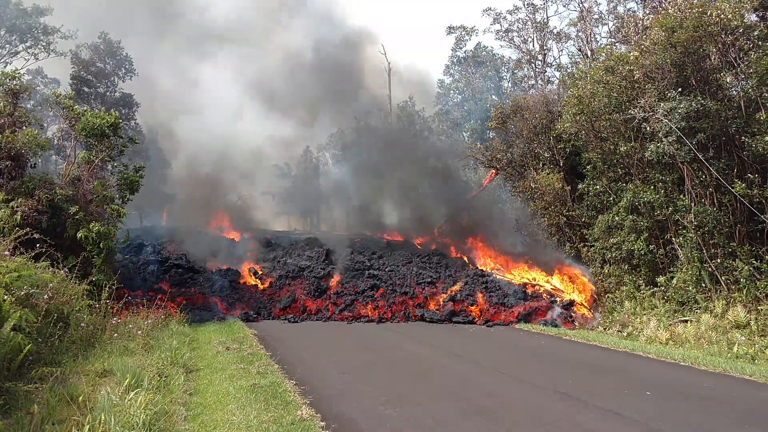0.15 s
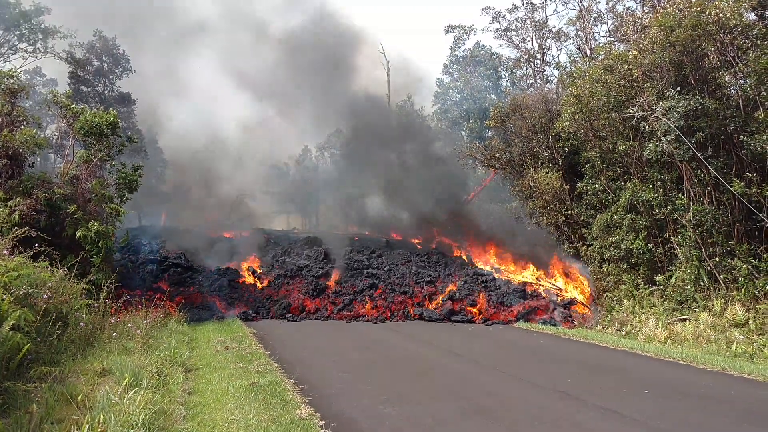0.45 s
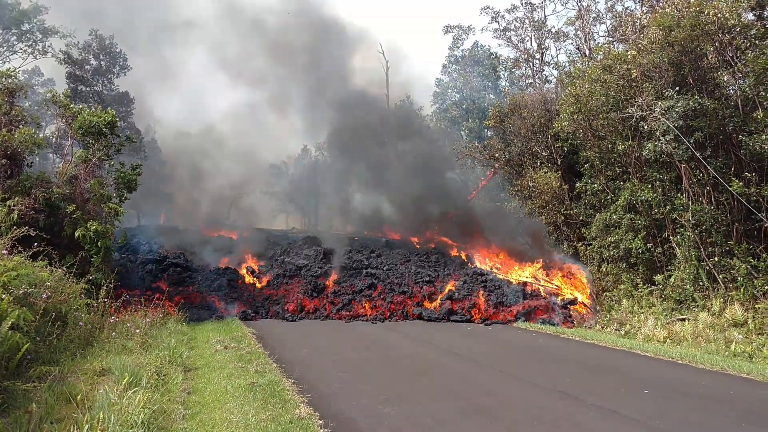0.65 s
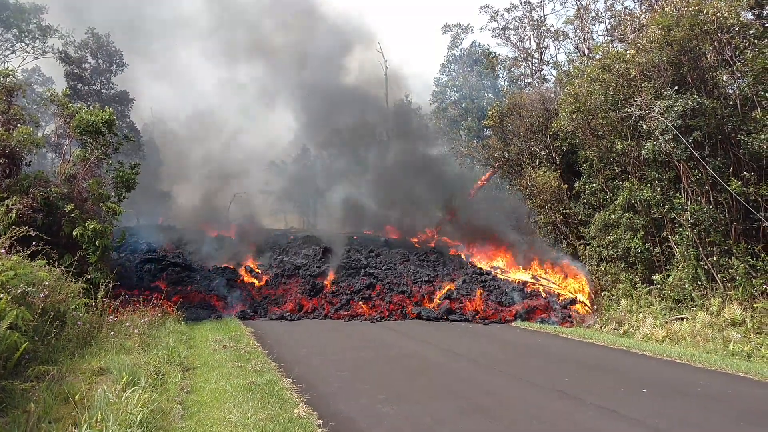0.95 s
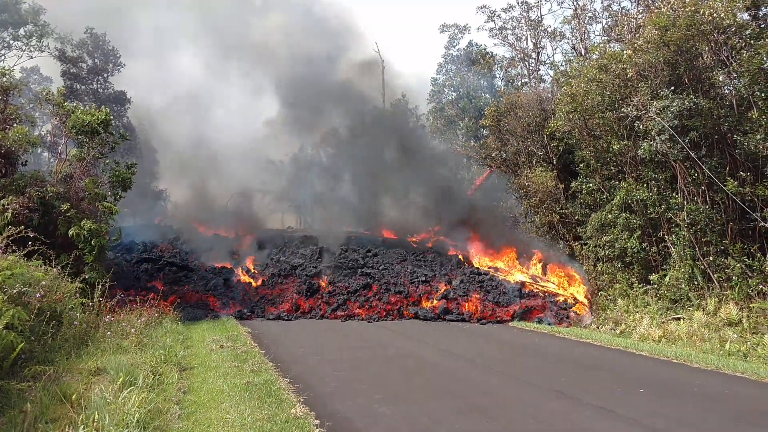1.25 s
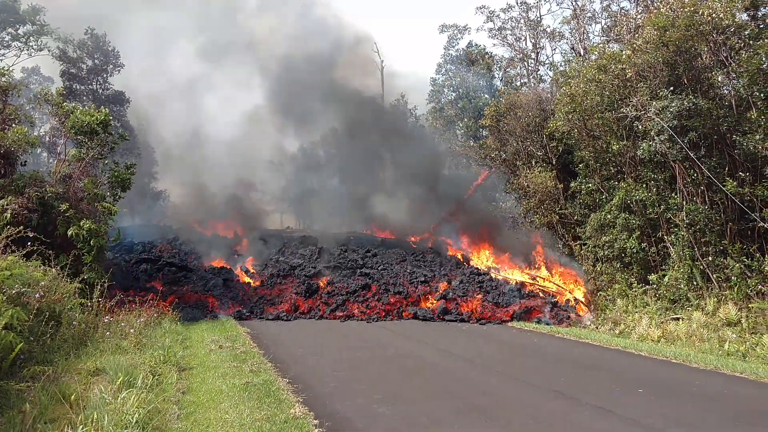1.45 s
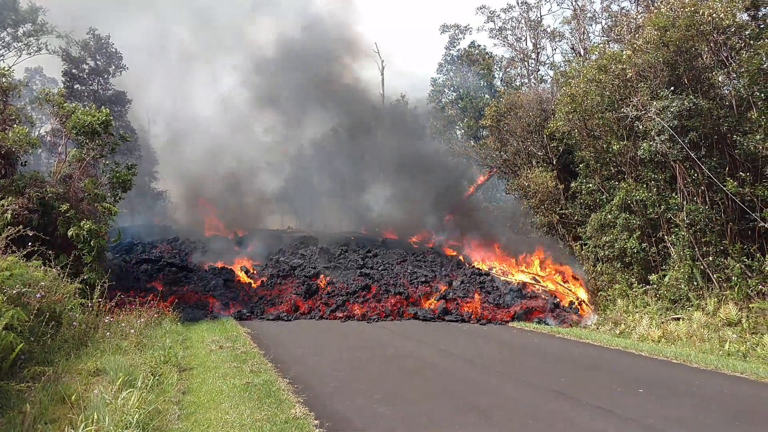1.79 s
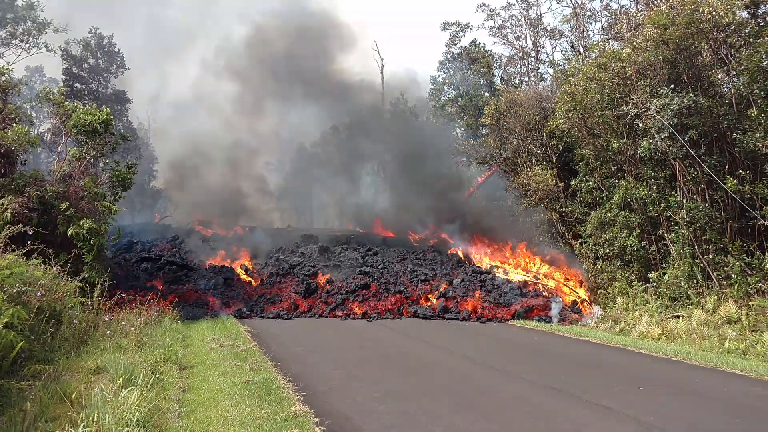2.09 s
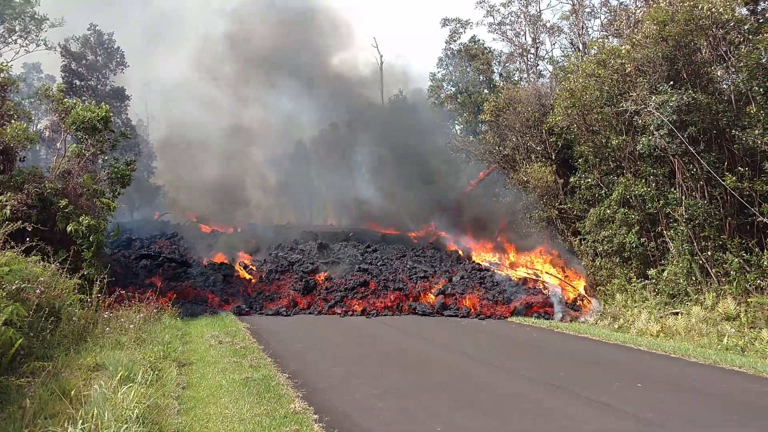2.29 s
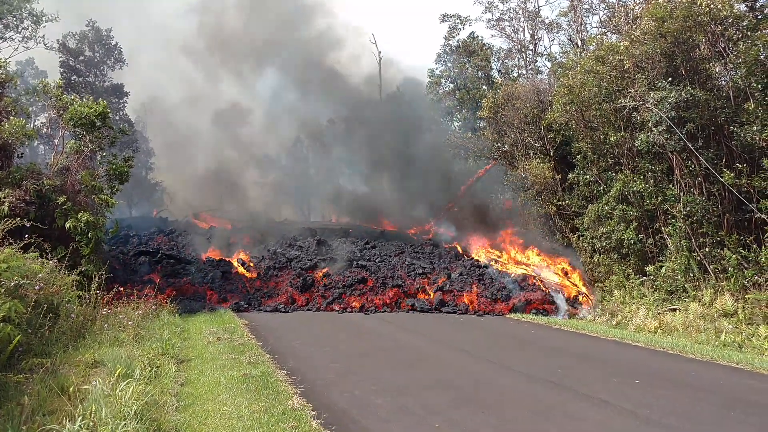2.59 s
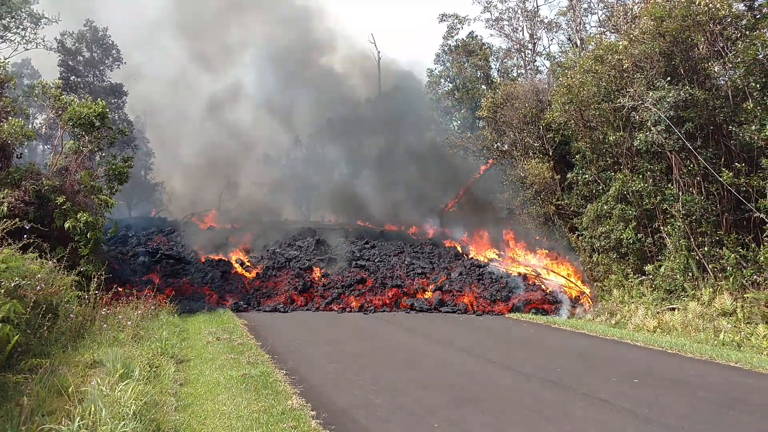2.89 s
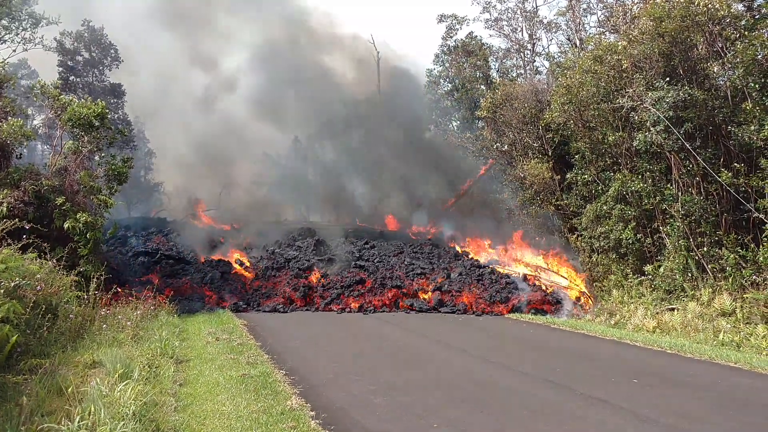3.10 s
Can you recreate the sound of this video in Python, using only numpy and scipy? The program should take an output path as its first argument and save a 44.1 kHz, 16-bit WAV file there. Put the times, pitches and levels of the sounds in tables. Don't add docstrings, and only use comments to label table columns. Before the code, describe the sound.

Steady fiery hiss and roar of creeping lava, crackling and snapping as wind thumps the microphone.

```python
import sys
import numpy as np
from scipy import signal
from scipy.fft import rfft, irfft
from scipy.io import wavfile

SR = 44100
rng = np.random.default_rng(int(sys.argv[2]) if len(sys.argv) > 2 else 0)


def unload_wav(signal):
    wavfile.write(
        sys.argv[1],
        SR,
        np.round(np.clip(np.atleast_2d(signal).T, -1, 1) * 32767).astype(np.int16),
    )


def to_linear_factor(level_db):
    exponent = np.asarray(level_db, float) / 20
    return 10 ** exponent


N = 142884

# time_s, level_db
BLAZE = [(0.0, -45), (0.31, -45), (0.49, -44), (0.84, -39.5), (1.02, -42.5), (1.22, -43), (1.47, -40),
         (1.67, -41.5), (1.91, -44), (2.29, -44), (2.44, -44.5), (2.63, -44), (2.94, -43.5), (3.24, -40.5)]
# frequency_hz, density_db (per Hz)
ROAR_SPECTRUM = [(60, 17.5), (200, -2.5), (500, 6), (1000, -2), (1800, 1.5), (3200, -0.5), (7000, -0.5),
                 (15000, -10.5)]
# frequency_hz, power_share (0-1)
COHERENCE = [(100, 0.78), (600, 0.97), (1200, 0.99), (1800, 0.63), (2600, 0), (5000, 0.09), (12000, 0)]
# frequency_hz, left_over_right_db
HISS_LEAN = [(2000, -6), (3300, -13), (4500, -4), (8500, 5.5), (12000, 2.5)]
# time_s, level_db
GUST = [(0.0, -49.5), (0.14, -60), (0.23, -46), (0.37, -46), (0.46, -46.5), (0.59, -47), (0.78, -47),
        (0.95, -47.5), (1.13, -47), (1.26, -49), (1.84, -57), (2.06, -53), (2.22, -46), (2.28, -49),
        (2.43, -55), (2.69, -57.5), (3.0, -55.5), (3.24, -55)]
# crest_s, peak_db, pitch_hz,
# width_s
BUFFETS = [(0.032, -17, 117, 0.015), (0.065, -19, 145, 0.021), (0.085, -15, 129, 0.005),
           (0.11, -18, 165, 0.0077), (0.246, -16.5, 190, 0.005), (0.259, -21, 167, 0.007),
           (0.272, -8.5, 151, 0.0076), (0.303, -15, 222, 0.0047), (0.318, -9.5, 167, 0.004),
           (0.331, -9, 133, 0.0029), (0.441, -14, 241, 0.0093), (0.48, -8.5, 145, 0.0047),
           (0.517, -16.5, 103, 0.029), (0.538, -23, 148, 0.007), (0.601, -15, 153, 0.005),
           (0.61, -14, 137, 0.0081), (0.715, -9, 98, 0.0062), (0.832, -15, 123, 0.015),
           (0.965, -9, 196, 0.0056), (0.98, -11.5, 157, 0.015), (1.036, -5.5, 136, 0.0022),
           (1.047, -8, 75.5, 0.0021), (1.057, -13, 128, 0.0058), (1.221, -5.5, 179, 0.0023),
           (1.242, -16.5, 153, 0.015), (1.271, -13, 188, 0.014), (2.09, -19.5, 222, 0.0039),
           (2.113, -14.5, 134, 0.012), (2.178, -10, 108, 0.0065), (2.225, -12, 149, 0.0087),
           (.14, -21.5, 128, 0.012), (0.346, -22, 199, 0.0089), (.375, -28.5, 108, 0.036),
          (.402, -20, 151, 0.0098), (.552, -22, 139, 0.0099), (.67, -19, 100, 0.0094),
          (1.111, -34, 149, 0.011), (1.175, -24, 111, 0.027), (1.201, -22.5, 158, 0.011),
          (1.295, -21, 150, .008), (1.879, -27, 70, .012), (2.061, -23.5, 149, 0.012),
          (2.211, -16, 144, 0.014), (2.271, -23.5, 159, 0.018), (3.001, -31, 110, 0.015)]
# start_s, peak_db, centre_hz, left_lead_ms
SNAPS = [(0.019, -22, 7200, 0.23), (0.0382, -19, 8084, 0.26), (0.1975, -16.5, 2710, 0.18),
         (0.2117, -23.5, 2540, 0.41), (0.2633, -25, 2980, 0.11), (0.2971, -35, 6846, 0.28),
         (1.0148, -22.5, 2620, 0.0094), (1.3062, -19.5, 2520, 0.31), (1.3745, -24, 2607, 0.3),
         (1.4103, -26.5, 1080, 0.095), (1.4237, -20, 6300, 0.064), (1.441, -35, 3300, 0.067),
         (1.557, -16, 7500, 0.27), (1.6134, -16.5, 7400, 0.26), (1.73, -17.5, 6000, 0.24),
         (1.826, -15.5, 5600, -0.06), (1.829, -23, 2770, 0.092), (1.8806, -17, 4540, 0.14),
         (2.2472, -19, 5600, 0.14), (2.2638, -15, 4540, 0.12), (2.3054, -23.5, 5028, 0.18),
         (2.3237, -31, 2577, -0.0021), (2.3295, -28.5, 2340, 0.04), (2.4307, -23, 4484, 0.13),
         (2.4548, -17.5, 6740, 0.24), (2.6606, -19, 3030, 0.16), (2.7333, -39, 2281, 0.13),
         (2.7438, -27, 6200, 0.15), (3.1987, -9, 3000, 0.16)]
# start_s, peak_db, ring_hz, decay_s
CHINKS = [(.061, -28, 3750, .006), (.146, -30, 899, .007), (.175, -26, 4030, .006), (.307, -20, 991, .005),
          (.497, -24, 1580, .009), (.198, -22, 1150, .005), (.714, -15, 1120, .004), (.726, -24, 950, .004),
          (.795, -25, 900, .004), (.842, -24, 1100, .005), (.915, -24, 1550, .004), (.749, -18, 1020, .007),
          (.914, -22, 1010, .006), (1.029, -21, 4530, .007), (1.042, -27, 4500, .005),
          (1.088, -28, 6850, .005), (1.381, -24, 7000, .004), (1.41, -23, 1010, .003),
          (1.417, -18, 3250, .004), (1.422, -22, 3100, .005), (1.0278, -17, 3400, .004),
          (1.04, -24, 3300, .005), (1.859, -28, 4020, .005), (1.9335, -19, 1480, .007),
          (1.9315, -17, 1000, .003), (1.9718, -23, 1410, .007), (2.205, -16, 850, .003),
          (2.208, -21, 560, .006), (3.197, -17, 750, .002), (2.839, -31, 1520, .007),
          (3.111, -30, 1050, .005)]
# start_s, peak_db, ring_hz, decay_s
HIGH_CHINKS = [
    (.714, -22, 5100, .003),
    (.755, -23, 5300, .008),
    (.815, -23, 3100, .006),
    (1.028, -20, 6600, .004),
    (1.4168, -20, 6200, .004),
    (1.422, -21, 6600, .003),
    (1.9325, -19, 4050, .006),
]
# start_s, depth_db
DUCKS = [
    (1.828, 1.5),
    (2.46, 4.5),
]
# frequency_hz, share (0-1)
CROSS_FEED = [(300, .79), (2600, .86), (4000, .79), (5200, .68), (8000, .6), (11500, .53), (13000, .62),
              (15000, .72)]

LEFT_LEAD_S, LEFT_LEAN_DB = 0.00022, 9.5
AHEAD_LEAD_S, AHEAD_LEAN_DB, AHEAD_BELOW_HZ = 0.00003, -0.8, 1900
ROAR_DB, FLICKER_DB = 4.5, 1.32
CRACKLES_PER_S, CRACKLE_DB, CRACKLE_SPREAD_DB, CRACKLE_CYCLES = 500, -3.5, 2.1, 4.1
GUST_DB, GUST_HZ, GUST_LUMP_DB, SPILL_DB = 17, 124.4, 2.0, -9.5
BUFFET_DB, BUFFET_SAG, BUFFET_EDGE, BUFFET_RISE, BUFFET_FALL = 1.5, 0.29, 0.27, 0.62, 0.64
BUFFET_TURN, BUFFET_TURN_SPREAD = 0.37, 0.099
SNAP_CYCLES, SNAP_EDGE_DB, SNAP_EDGE_RATIO = 0.6, -6, 2.6
BOUNCE_DB, BOUNCE_S, SNAP_TAIL_DB, SNAP_TAIL_T60_S = -35, 0.000668, -12, 0.007
CHINK_DB, CHINK_RATTLE_DB, CHINK_WIDTH, CHINK_FIZZ_DB = -10, -3.5, 0.06, -7
RECOVER_DB_PER_S, DUCK_ATTACK_S = 7, 0.0038
BASS_CUT_HZ, TOP_CUT_HZ = 49, 15850
CROSS_LAG, LOW_EXTRA_LAG, EXTRA_LAG_HZ = 17, 3, 1500


def rms_one(x):
    return x / np.sqrt(np.mean(x ** 2) + 1e-20)


def in_time(rows):
    return np.interp(np.arange(N) / SR, *np.transpose(rows))


def at_hz(points, hz):
    table_hz, value = np.transpose(points)
    return np.interp(np.log(hz), np.log(table_hz), value)


def drift(rate_hz):
    step = 20
    r = np.exp(-2 * np.pi * step * rate_hz / SR)
    noise = rng.standard_normal(N // step + 3002)
    slow = signal.lfilter([1], [1, -2 * r, r * r], noise)[3000:]
    slow = (slow - slow.mean()) / slow.std()
    return np.interp(np.arange(N) / step, np.arange(len(slow)), slow)


def resonance(x, hz, width_hz):
    r = np.exp(-np.pi * width_hz / SR)
    poles = [1, -2 * r * np.cos(2 * np.pi * hz / SR), r * r]
    return signal.lfilter([(1 - r * r) / 2, 0, (r * r - 1) / 2], poles, x)


def ports(x, lead_s, lean_db=LEFT_LEAN_DB):
    hz = np.arange(len(x) // 2 + 1) * SR / len(x)
    late = irfft(rfft(x) * np.exp(-2j * np.pi * hz * lead_s), len(x))
    return np.array([x * to_linear_factor(lean_db / 2), late * to_linear_factor(-lean_db / 2)])


def add(out, start_s, sound):
    i = int(start_s * SR)
    out[..., i:i + sound.shape[-1]] += sound[..., :N - i]


def roar():
    out = 0
    together = 1.03 * drift(16.7)
    edges = 40 * 2 ** np.arange(0, 9, 0.5)
    sources = []
    for noise in rng.standard_normal((2, 3, N)):
        ahead = ports(noise[0], AHEAD_LEAD_S, AHEAD_LEAN_DB)
        left = ports(noise[0], LEFT_LEAD_S)
        sources.append((ahead, left, noise[1:]))
    for k, (low, high) in enumerate(zip(edges, edges[1:])):
        hz = np.sqrt(low * high)
        alike = np.clip(at_hz(COHERENCE, hz), 0, 1)
        ahead, left, diffuse = sources[k % 2]
        direct = ahead if hz < AHEAD_BELOW_HZ else left
        leaning = diffuse * to_linear_factor(at_hz(HISS_LEAN, hz) * np.array([[0.5], [-0.5]]))
        mixed = np.sqrt(alike) * direct + np.sqrt(1 - alike) * leaning
        band = signal.sosfilt(signal.butter(2, [low, high], "band", fs=SR, output="sos"), mixed)
        flicker_db = FLICKER_DB * (together + 1.08 * drift(30.6))
        out = out + band * to_linear_factor(at_hz(ROAR_SPECTRUM, hz) + flicker_db)
    return rms_one(out) * to_linear_factor(ROAR_DB)


def crackle():
    sizes = to_linear_factor(CRACKLE_SPREAD_DB * np.minimum(rng.exponential(1, N), 4)) * rng.choice([-1, 1], N)
    born = rng.random(N) < CRACKLES_PER_S * to_linear_factor(5.0 * drift(12.0)) / SR
    pitches_hz = np.geomspace(900, 11000, 20)
    dealt = rng.integers(0, 20, N)
    leads_s = LEFT_LEAD_S + 0.00004 * rng.standard_normal(20)
    rings = 0
    for k, hz in enumerate(pitches_hz):
        bursts = sizes * born * (dealt == k) + 1e-18
        ring = resonance(bursts, hz, hz / CRACKLE_CYCLES)
        rings = rings + ports(ring, leads_s[k]) * (hz / 3000) ** -0.5
    return rms_one(rings) * to_linear_factor(CRACKLE_DB)


def wind():
    low = signal.butter(2, [GUST_HZ / 1.5, GUST_HZ * 1.6], "band", fs=SR, output="sos")
    turbulence = rms_one(signal.sosfilt(low, rng.standard_normal((2, N))))
    bed = turbulence * to_linear_factor(in_time(GUST) + GUST_DB + GUST_LUMP_DB * drift(11.3))
    t = np.arange(-1300, 3000) / SR
    for crest_s, peak_db, hz, width_s in BUFFETS:
        u = t / max(width_s, 0.003) / np.where(t < 0, BUFFET_RISE, BUFFET_FALL)
        turn = BUFFET_TURN + BUFFET_TURN_SPREAD * rng.random()
        phase = 2 * np.pi * (turn + hz * t * (1 - BUFFET_SAG * np.tanh(u)))
        edge = BUFFET_EDGE * np.sin(2.064 * phase) * np.exp(-2 * u ** 2)
        buffet = np.exp(-u ** 2) * (np.sin(phase) + edge)
        add(bed[1], crest_s + t[0], to_linear_factor(peak_db + BUFFET_DB) * buffet)
    return np.array([to_linear_factor(SPILL_DB) * bed[0], bed[1]])


def snap_pulse(t, hz):
    return -np.sin(2 * np.pi * (hz * t - 0.2)) * np.exp(-(hz * t / SNAP_CYCLES) ** 2)


def snaps():
    out = np.zeros((2, N))
    t = np.arange(-100, 1500) / SR
    for start_s, peak_db, hz, lead_ms in SNAPS:
        bounce = to_linear_factor(BOUNCE_DB) * snap_pulse(t - BOUNCE_S, hz)
        edge = to_linear_factor(SNAP_EDGE_DB) * snap_pulse(SNAP_EDGE_RATIO * t, hz)
        scatter = resonance(rng.standard_normal(len(t)), hz, 1.7 * hz)
        tail = scatter * to_linear_factor(SNAP_TAIL_DB - 60 * t / SNAP_TAIL_T60_S) * (t > 0)
        snap = snap_pulse(t, hz) + bounce + edge + tail
        add(out, start_s + t[0], to_linear_factor(peak_db) * ports(snap, lead_ms / 1000))
    return out


def chinks():
    out = np.zeros((2, N))
    t = np.arange(3000) / SR
    for start_s, peak_db, hz, decay_s in CHINKS + HIGH_CHINKS:
        noise = rng.standard_normal(len(t))
        envelope = (1 - np.exp(-t / 0.0001)) * np.exp(-t / decay_s)
        rattle = to_linear_factor(CHINK_RATTLE_DB) * rms_one(resonance(noise, hz, CHINK_WIDTH * hz))
        fizz = to_linear_factor(CHINK_FIZZ_DB) * resonance(noise, 1300, 3700)
        chink = envelope * (np.sin(2 * np.pi * hz * t) + rattle + fizz)
        add(out, start_s, to_linear_factor(peak_db + CHINK_DB) * ports(chink / abs(chink).max(), AHEAD_LEAD_S))
    return out


def scene():
    fire = to_linear_factor(in_time(BLAZE)) * (roar() + crackle())
    return fire + wind() + snaps() + chinks()


def band_limit(x):
    return signal.sosfilt(signal.butter(12, 15830, fs=SR, output="sos"), x)


def record(dry):
    t = np.arange(N) / SR
    duck_db = 0
    for start_s, depth_db in DUCKS:
        recovery = np.clip(depth_db - RECOVER_DB_PER_S * (t - start_s), 0, None)
        duck_db = duck_db + recovery * np.clip((t - start_s) / DUCK_ATTACK_S, 0, 1)
    bass_cut = signal.butter(2, BASS_CUT_HZ, "high", fs=SR, output="sos")
    x = signal.sosfilt(bass_cut, dry * to_linear_factor(-duck_db))
    hz = np.arange(N // 2 + 1) * SR / N + 1e-9
    lag = CROSS_LAG + LOW_EXTRA_LAG / (1 + (hz / EXTRA_LAG_HZ) ** 4)
    feed = at_hz(CROSS_FEED, hz) * np.exp(-2j * np.pi * hz * lag / SR)
    wide = x - irfft(rfft(x[::-1]) * feed, N)
    top_cut = signal.cheby2(16, 40, TOP_CUT_HZ, fs=SR, output="sos")
    return band_limit(signal.sosfilt(top_cut, wide))


dry = scene()
out = record(dry)
unload_wav(out)
```